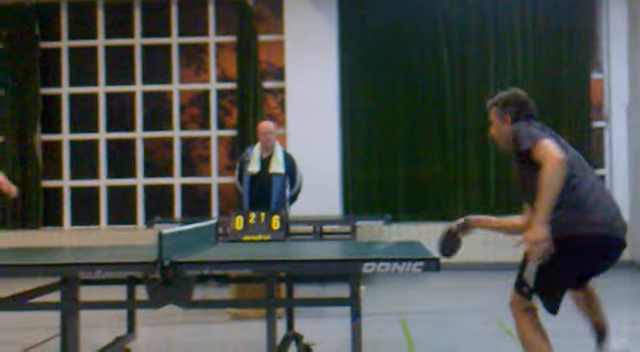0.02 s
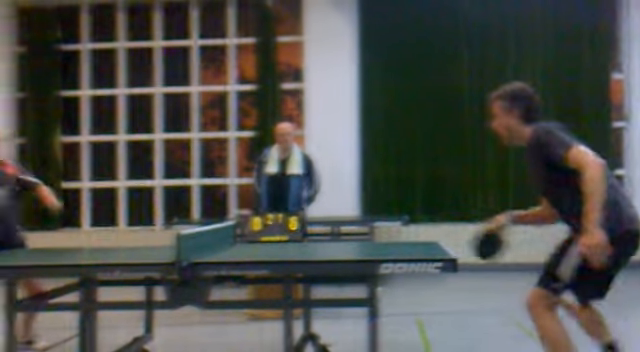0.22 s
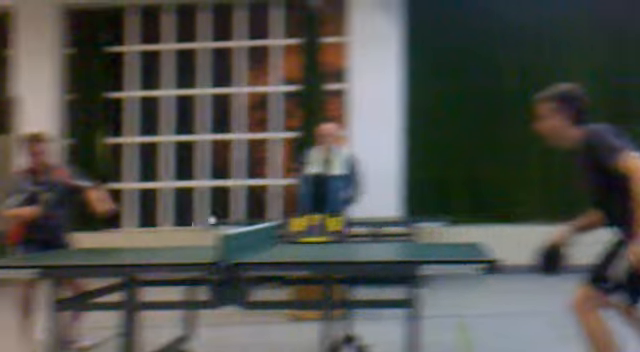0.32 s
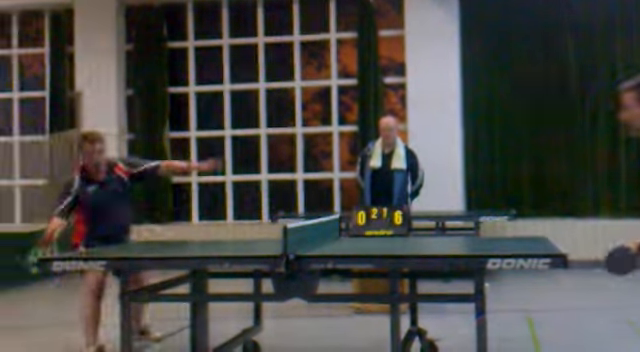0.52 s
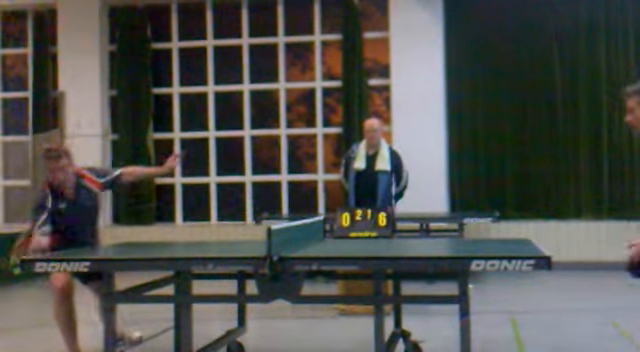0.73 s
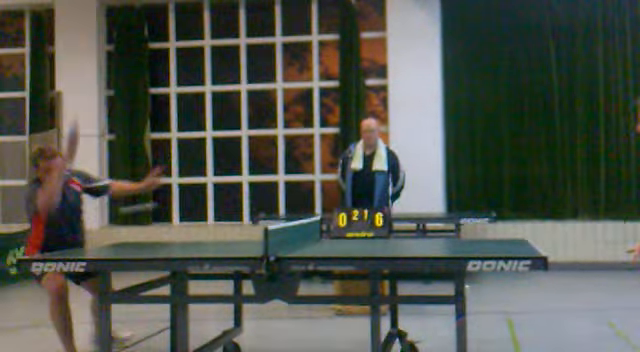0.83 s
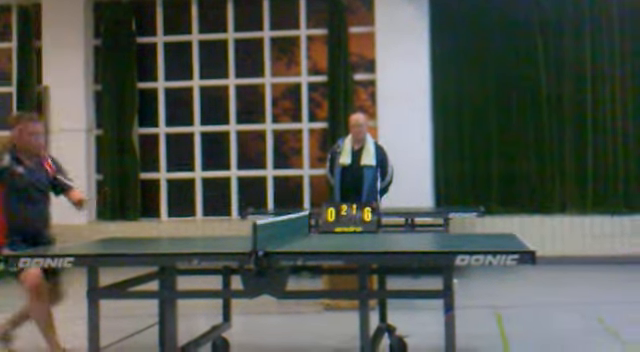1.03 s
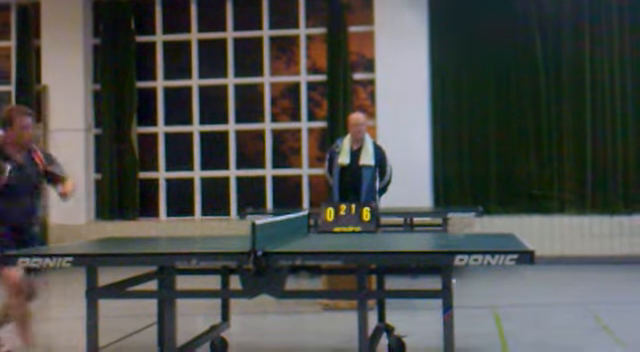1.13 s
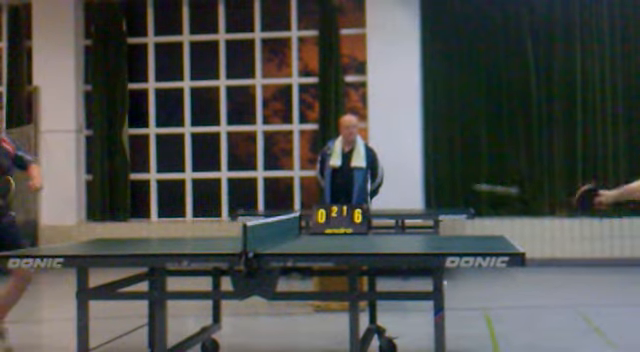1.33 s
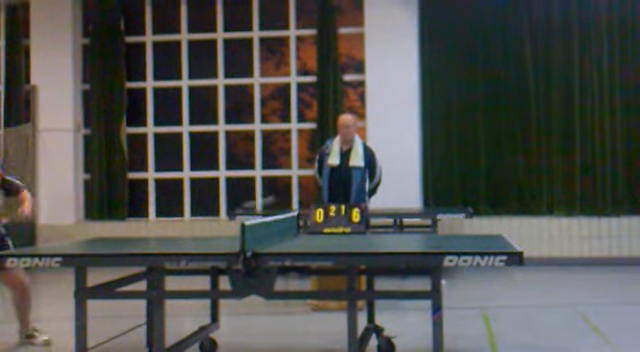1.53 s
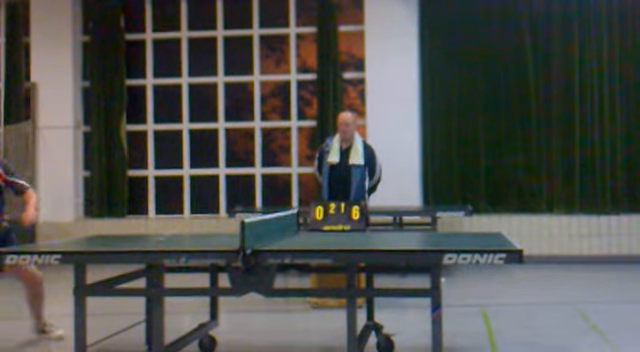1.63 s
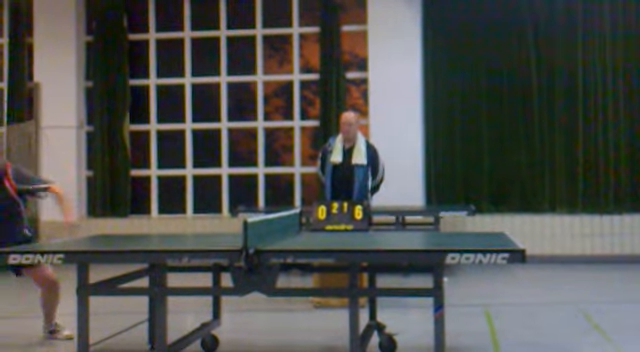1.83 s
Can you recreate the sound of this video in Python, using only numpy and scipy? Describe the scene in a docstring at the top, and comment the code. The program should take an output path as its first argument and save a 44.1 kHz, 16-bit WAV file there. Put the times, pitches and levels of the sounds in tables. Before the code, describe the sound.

A heavy stamp on a sprung floor and a sharp shoe squeak overload the microphone, following a light table tennis bat hit. The loose ball ticks away, then quieter footsteps and another squeak ring through the sports hall.

```python
"""A table tennis player stamps and skids: the sole slaps, the sprung floor booms, the rubber squeaks.
It is the end of a point. A bat ticks and pocks just before the stamp, then the loose ball bounces away,
its thin shell ringing, and softer steps end in a second squeak. Shoes click, a double knock comes
from far off, and a low rumble lies underneath. The sports hall rings after each hit,
and the stamp and the first squeak overload the microphone."""
import sys
import numpy as np
from scipy import signal
from scipy.fft import rfft, irfft, next_fast_len
from scipy.io import wavfile
from scipy.ndimage import map_coordinates

SR = 44100
rng = np.random.default_rng(int(sys.argv[2]) if len(sys.argv) > 2 else 0)


def output_pcm(signal):
    """Save a mono or channel-first signal as 16-bit PCM at the path in sys.argv[1].

    Samples are clipped to [-1, 1] before scaling.
    """
    pcm = np.clip(np.atleast_2d(signal).T, -1, 1) * 32767
    wavfile.write(sys.argv[1], SR, np.round(pcm).astype(np.int16))


N = 81585

# Footfalls. Each row: start in seconds, boom level in dB, slap level in dB, slap rise in seconds,
# slap fade in seconds, treble tilt in dB per octave. A fade is the time taken to drop by 60 dB.
FOOTFALLS = [(0.228, -58, -15.5, .0004, 0.3, 4), (.244, 0, -28.5, 0.0017, 0.32, -1.5),
             (.625, -33.5, -33, 0.0078, 0.24, -17), (1.008, -45, -41, 0.0049, 0.1, 1),
             (1.422, -34.5, -25, 0.016, .15, -7), (1.445, -24.5, -29, 0.02, 0.44, -4.5),
             (1.545, -30.5, -30, 0.018, 0.18, -2.5), (1.682, -35.5, -33, 0.0042, 0.076, -17),
             (1.817, -43, -34, 0.0062, .1, -17)]
# The tone of a sole's slap. Each row: frequency in Hz, level in dB.
SOLE_TONE = [(50, -5), (170, 5), (300, 1), (500, -9), (680, -4.5), (1050, -8.5), (2000, -10), (2500, -10),
             (3200, -15.5), (5500, -23.5), (9000, -43.5), (16000, -55.5)]
# The notes the floor rings at. Each row: pitch in Hz, level in dB, fade in seconds.
FLOOR_NOTES = [(57.6, -4.5, 0.22), (78.7, -0.5, 0.33), (108.44, 1.5, 0.21), (133.1, 5.5, 0.099),
               (178, -2, 0.18), (265.7, -5, 0.095)]
# Shifts of body weight. Each row: start in seconds, level in dB.
WEIGHT_SHIFTS = [(1.213, -31), (1.599, -32.5), (1.826, -30.5)]


def steps():
    """Soles slap the boards and set the sprung floor booming; shifts of weight make it sway."""
    tilt_above_hz, sway_hz = 1400, 49.8
    boom, slap, sway = np.zeros((3, N))
    for start, boom_db, slap_db, rise, fade, tilt_db in FOOTFALLS:
        tone = [(hz, db + tilt_db * np.log2(max(hz / tilt_above_hz, 1))) for hz, db in SOLE_TONE]
        slap += gain(slap_db) * blow(start, rise, fade) * noise(tone)
        for hz, db, floor_fade in FLOOR_NOTES:
            pitch = hz * (1 + rng.normal(0, 0.03))  # a little different for each step
            note = np.sin(2 * np.pi * pitch * since(start))
            boom += gain(boom_db + db) * blow(start, rise=0.0076, fade=floor_fade) * note
    for start, db in WEIGHT_SHIFTS:
        note = np.sin(2 * np.pi * sway_hz * since(start))
        sway += gain(db) * blow(start, rise=0.007, fade=0.56) * note
    return hall(boom, echo_db=-12.5) + hall(slap, echo_db=-9) + sway


# Shoe skids; the second one catches twice, so it has two rows. Each row: start in seconds,
# length in seconds, level in dB, pitch in Hz, first overtone in dB, whistle in dB, swell in dB,
# roughness in dB, beat rate in Hz, change for each further overtone in dB.
SKIDS = [(0.263, 0.06, -6, 3562, -20.5, -29, 2.5, -15, 150, -12),
         (1.502, 0.039, -20, 4452, -25.5, -7.5, 2, -19, 200, -33),
         (1.536, 0.029, -12, 4464, -40.5, -18, 2, -30, 205.4, -27)]
# The tone of rubbing rubber. Each row: frequency in Hz, level in dB.
RUB_TONE = [(600, -7), (2500, -27.5), (3100, -1.5), (4200, 0), (5300, -12.5), (6300, -4.5), (8000, -15),
            (9200, -35), (16000, -38.5)]


def squeaks():
    """Two patches of a skidding sole squeal and beat against each other; its edge whistles higher up."""
    whistle_hz = 5945
    out = np.zeros(N)
    for start, length, db, hz, overtone_db, whistle_db, swell_db, rough_db, beat_hz, step_db in SKIDS:
        t = since(start)
        fade_in = 1 - np.exp(-t / 0.0023)
        fade_out = np.exp(-since(start + length) / 0.018)
        flutter_db = 1.5 * wobble(120)
        swell = gain(swell_db * (np.minimum(t / length, 1) - 1.5) + flutter_db)
        first = rubber_patch(hz, t, overtone_db, step_db, rough_db)
        second = rubber_patch(hz + beat_hz, t, overtone_db, step_db, rough_db)
        squeal = swell * (first + gain(-2.5) * second)
        whistle_pitch = whistle_hz * (1 + 0.013 * wobble(505.9))
        whistle = gain(whistle_db) * np.sin(2 * np.pi * np.cumsum(whistle_pitch) / SR)
        rub = gain(rough_db - 5.5) * noise(RUB_TONE)
        out += hall(gain(db) * fade_in * fade_out * (squeal + whistle + rub), echo_db=-4.5)
    return out


def rubber_patch(hz, t, overtone_db, step_db, rough_db):
    """One patch of rubber sticks and slips; its pitch starts high, settles and trembles."""
    catch = 0.058 * np.exp(-t / 0.0027)
    tremble = 0.019 * wobble(505.9)
    phase = 2 * np.pi * np.cumsum(hz * (1 + catch + tremble)) / SR
    phase += gain(rough_db) * wobble(1587)  # each slip is a little uneven
    overtones = sum(gain(overtone_db + step_db * k) * np.sin((k + 2) * phase) for k in range(3))
    return np.sin(phase) + overtones


# Bounces of the ball. Each row: start in seconds, knock level in dB, shell ring level in dB.
BALL_BOUNCES = [(0.1978, -39.5, -45.5), (.613, -41.5, -47), (1.2579, -37.5, -38.5), (1.798, -37.5, -45.5)]
# The tone of the ball's knock. Each row: frequency in Hz, level in dB.
KNOCK_TONE = [(250, -25), (550, -5), (850, -13.5), (1200, -2.5), (1550, -1), (1850, 0), (2200, -13.5),
              (2650, -21), (3800, -10.5), (4700, -21.5), (7500, -29.5), (15000, -29)]
# The notes the ball's shell rings at. Each row: pitch in Hz, width in Hz, level in dB.
SHELL_NOTES = [(5800, 500, 7), (8900, 500, 8), (10400, 1700, -2), (12300, 1100, -2)]
# Echoes of the ball off near surfaces. Each row: delay in seconds, level in dB.
NEAR_ECHOES = [(.0095, 4), (.031, -10), (.049, -5)]


def ball():
    """Each bounce knocks and rings the thin shell; near surfaces throw the sound back."""
    def shell_peaks(freq):
        return sum(gain(db) / (1 + ((freq - hz) / (width / 2)) ** 2) for hz, width, db in SHELL_NOTES)

    def arrivals(start, rise, fade):
        paths = [(0.003, 0.0039)] + NEAR_ECHOES  # the direct sound comes first
        return sum(gain(db) * blow(start + delay, rise, fade) for delay, db in paths)

    out = np.zeros(N)
    for start, knock_db, shell_db in BALL_BOUNCES:
        knock = noise(KNOCK_TONE) * arrivals(start, rise=0.0032, fade=0.073)
        shell = normalise(filtered(rng.standard_normal(N), shell_peaks))
        shell *= arrivals(start, rise=0.0002, fade=0.015)
        out += gain(knock_db) * hall(knock, echo_db=-0.5) + gain(shell_db) * hall(shell, echo_db=-5)
    return out


# Bat on ball, a faint touch and then the full pock. Each row: start in seconds, level in dB.
BAT_HITS = [(.068, -47.5), (.084, -35.5)]
# The tone of the bat. Each row: frequency in Hz, level in dB.
BAT_TONE = [(300, -26.5), (700, -21.5), (900, 0.5), (1030, 2), (1250, -13), (1550, -15.5), (2200, -33),
            (12000, -37)]


def bat():
    """Rubber-faced wood meets the ball with a hollow pock."""
    pocks = np.zeros(N)
    for start, db in BAT_HITS:
        pocks += gain(db) * blow(start, rise=0.0027, fade=0.056) * noise(BAT_TONE)
    return hall(pocks, echo_db=-4)


# Light clicks, first from the bat, then from shoes. Each row: start in seconds, level in dB.
LIGHT_CLICKS = [(0.066, -51), (0.738, -50), (0.905, -44), (1.024, -62.5), (1.151, -45.5), (1.4149, -36),
                (1.428, -43.5), (1.46, -33)]
# The tone of a click. Each row: frequency in Hz, level in dB.
CLICK_TONE = [(300, -16), (1200, -17), (2600, -12.5), (4500, -2.5), (8000, -15), (11000, -15),
              (16000, -31.5)]


def clicks():
    """Light, sharp clicks: the bat's first touch on the ball, then shoes on the floor."""
    loudness = sum(gain(db) * blow(start, rise=0.0003, fade=0.015) for start, db in LIGHT_CLICKS)
    return hall(loudness * noise(CLICK_TONE), echo_db=2.5)


# Distant thuds. Each row: start in seconds, level in dB.
FAR_THUDS = [(0.921, -40.5), (0.937, -38.5)]
# The tone of a thud. Each row: frequency in Hz, level in dB.
THUD_TONE = [(150, -30.5), (290, 0), (375, -1), (480, -16.5), (800, -8), (1300, -21.5), (3000, -30),
             (12000, -56)]


def thuds():
    """A soft, boxy double knock comes from across the hall."""
    loudness = sum(gain(db) * blow(start, rise=0.003, fade=0.084) for start, db in FAR_THUDS)
    return hall(loudness * noise(THUD_TONE), echo_db=-3)


# How loud the rumble is as the players move about. Each row: time in seconds, level in dB.
RUMBLE_LOUDNESS = [(.2, -60), (.75, -47.5), (1.1, -51.5), (1.25, -43), (1.35, -52.5), (1.6, -35),
                   (1.85, -47)]
# The tone of the rumble. Each row: frequency in Hz, level in dB.
RUMBLE_TONE = [(25, -24), (55, 5.5), (100, 5.5), (160, -3.5), (300, -9.5), (700, -14), (2000, -24),
               (6000, -30.5), (15000, -48.5)]


def rumble():
    """Shuffling feet keep the floor and the hall faintly stirring."""
    level_db = np.interp(since(0), *np.transpose(RUMBLE_LOUDNESS))
    return gain(level_db) * noise(RUMBLE_TONE)


# The tone of the hall's air. Each row: frequency in Hz, level in dB.
AIR_TONE = [(22, -24.5), (55, 4), (100, 2), (200, -13), (500, -20), (1200, -22), (2500, -24.5), (6000, -29),
            (15000, -38.5)]


def air():
    """The air in the hall makes a faint, steady, low noise."""
    return gain(-57) * noise(AIR_TONE)


# How long the hall rings. Each row: frequency in Hz, fade in seconds.
HALL_FADES = [(60, 0.59), (150, .95), (400, 0.78), (1300, 0.81), (2500, 0.69), (3800, 0.65), (7000, 0.55),
              (14000, 0.35)]


def hall(sound, echo_db):
    """The hall follows a sound with a wash of echoes whose treble dies first."""
    gap_s, build_s = 0.0013, 0.0052
    hz, t, bands = signal.stft(rng.standard_normal(SR * 3 // 2), SR, nperseg=256)
    fading = gain(-60 * t / look_up(HALL_FADES, hz)[:, None])
    tail = signal.istft(bands * fading, SR, nperseg=256)[1]
    tail *= 1 - np.exp(-since(gap_s)[:len(tail)] / build_s)
    echoes = signal.fftconvolve(sound, tail / np.linalg.norm(tail))[:N]
    return sound + gain(echo_db) * echoes


def gain(db):
    """Turn decibels into a number to multiply by."""
    return 10 ** (np.asarray(db) / 20)


def normalise(sound):
    """Scale a sound to an average power of 1."""
    return sound / np.sqrt(np.mean(sound ** 2) + 1e-20)


def look_up(table, hz):
    """Read between the rows of a frequency table, with octaves evenly spaced."""
    freqs, values = np.transpose(table)
    return np.interp(np.log(hz + 1), np.log(freqs + 1), values)


def since(start):
    """Seconds since the start, zero before it."""
    return np.maximum(np.arange(N) / SR - start, 0)


def blow(start, rise, fade):
    """The loudness of a hit: it rises quickly, then drops 60 dB every `fade` seconds."""
    t = since(start)
    return (1 - np.exp(-t / rise)) * gain(-60 * t / fade)


def wobble(rate):
    """A smooth curve through `rate` random values a second."""
    return map_coordinates(rng.standard_normal(8192), [np.arange(N) * rate / SR], mode="wrap")


def filtered(sound, response):
    """Turn each frequency up or down by the amount response(hz) gives."""
    size = next_fast_len(N + SR // 4)
    hz = np.fft.rfftfreq(size, 1 / SR)
    return irfft(rfft(sound, size) * response(hz), size)[:N]


def noise(tone):
    """Noise shaped by a tone table, with an average power of 1."""
    return normalise(filtered(rng.standard_normal(N), lambda hz: gain(look_up(tone, hz))))


def scene():
    """Bat, ball and feet sound over the low rumble of the hall, in one channel."""
    return (bat() + ball() + steps() + thuds() + clicks() + squeaks() + rumble() + air())[None]


def record(dry):
    """The overloaded microphone flattens the loudest peaks, and the highest treble is cut off."""
    ceiling, hardness, top_hz = 0.66, 9.7, 15800
    clipped = dry[0] / (1 + np.abs(dry[0] / ceiling) ** hardness) ** (1 / hardness)
    return filtered(clipped, lambda hz: hz < top_hz)[None]


dry = scene()
out = record(dry)
output_pcm(out)
```